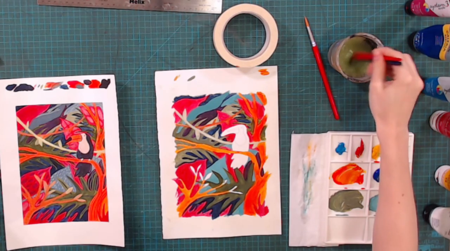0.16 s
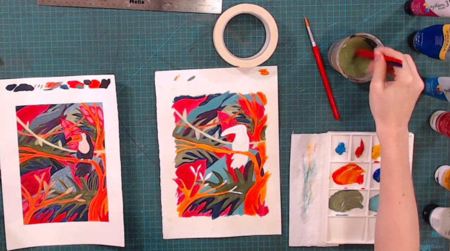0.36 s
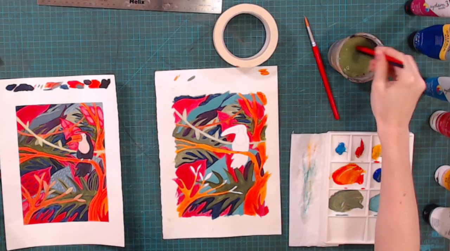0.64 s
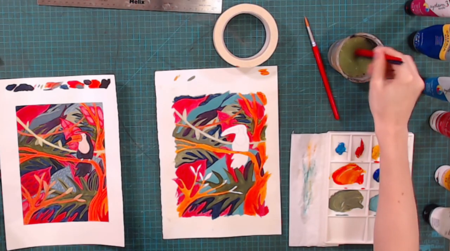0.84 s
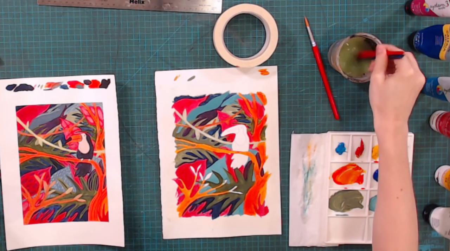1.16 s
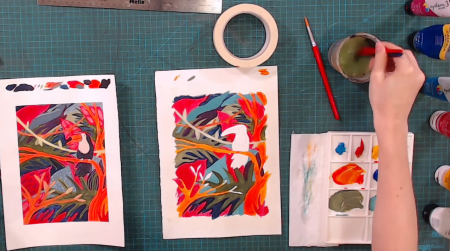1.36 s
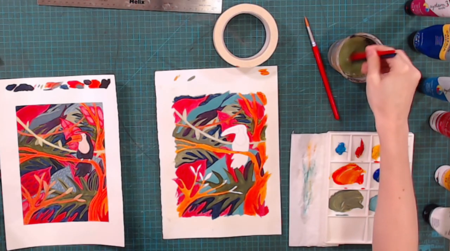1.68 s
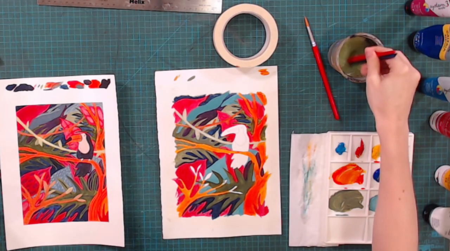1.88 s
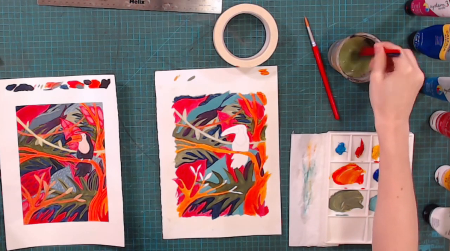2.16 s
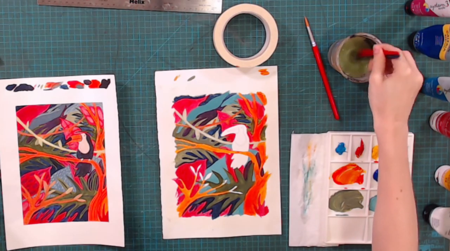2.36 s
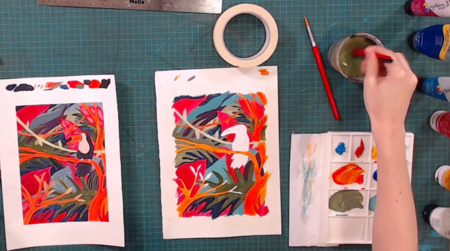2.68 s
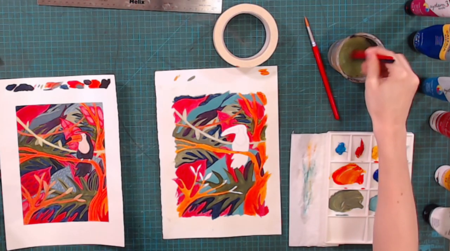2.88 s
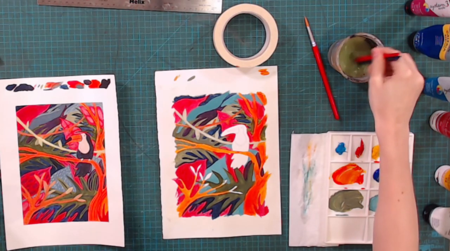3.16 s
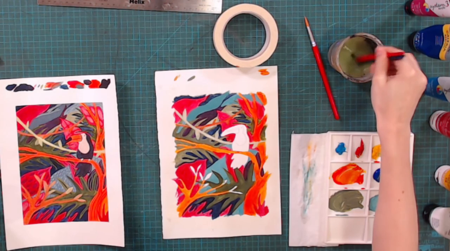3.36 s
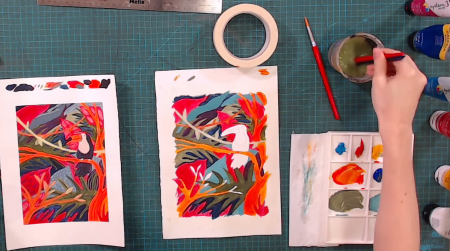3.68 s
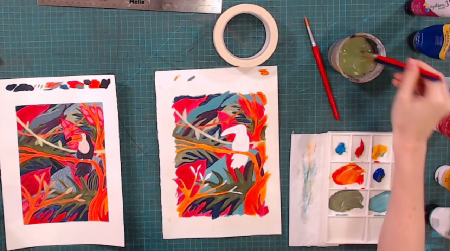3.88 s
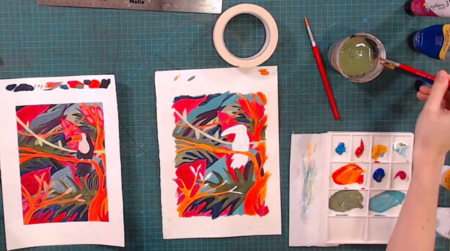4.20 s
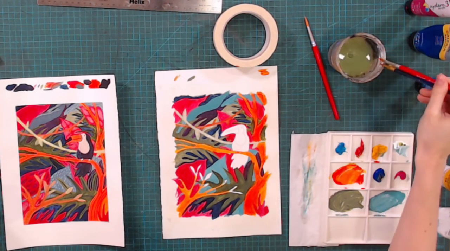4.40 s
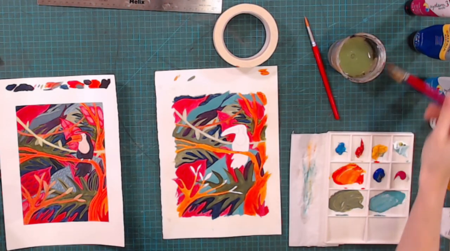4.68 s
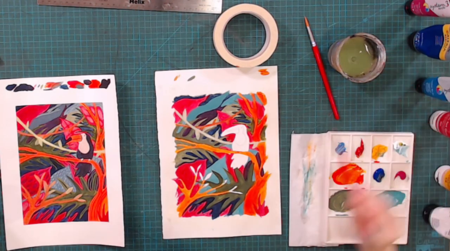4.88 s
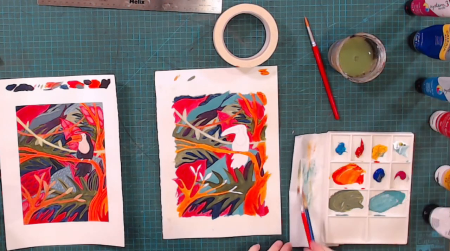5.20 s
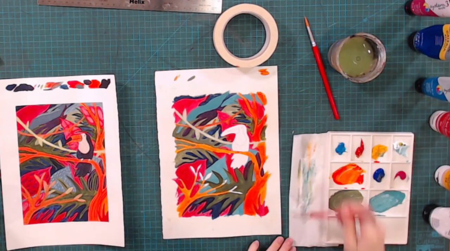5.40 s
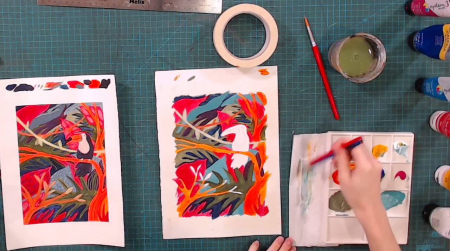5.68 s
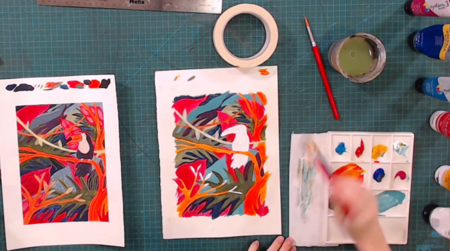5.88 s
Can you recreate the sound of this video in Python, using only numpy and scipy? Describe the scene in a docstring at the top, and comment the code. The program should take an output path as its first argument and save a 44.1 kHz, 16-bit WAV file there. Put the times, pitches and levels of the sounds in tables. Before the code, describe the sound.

Close up in a small quiet room, a wet paintbrush scrubs the bottom of a glass water jar about five times a second. Small bubbles gurgle, the jar thuds softly on the table, and a few bright clinks stand out. Stirring stops before four seconds; a light tap and rim wipe follow, then soft papery swipes and damp pats on a towel over faint hiss and hum.

```python
"""A paintbrush swirls in a glass jar of water: clinks on the glass and sharp ticks, each a noise tick plus damped modes.
Bubbles and two jar knocks are rising decaying tones; bristles scrub the bottom as shaped noise, exciting jar modes.
Pushes on the table ring its low modes. The brush is wiped on the rim, then on a paper towel: swelling noise and pats.
Air stirred by the arm rumbles faintly over hiss and hum. Two spaced microphones hear it all in a small room."""
import sys
import numpy as np
from scipy import signal
from scipy.fft import rfft, irfft
from scipy.io import wavfile
from scipy.ndimage import uniform_filter1d, minimum_filter1d

SR = 44100
rng = np.random.default_rng(int(sys.argv[2]) if len(sys.argv) > 2 else 0)


def transcribe(signal):
    """Save signal, clipped to [-1, 1], as a 16-bit WAV file at the path in sys.argv[1]."""
    frames = np.atleast_2d(signal).T
    limited = np.clip(frames, -1, 1)
    pcm = np.round(limited * 32767).astype(np.int16)
    wavfile.write(sys.argv[1], SR, pcm)


N = 266760
T = np.arange(N) / SR
# extra travel time from the jar to the right microphone; upper limit of the recorded band
LAG_S, TOP_HZ = 17 / SR, 16100

# Steady hiss. Each row: frequency in Hz, relative spectrum level in dB.
ROOM_TONE = [(15, -9.5), (27, 0), (38, -10.5), (52, -3.5), (75, -12), (105, -11), (130, -16), (200, -19.5),
             (370, -26), (700, -31.5), (1600, -36.5), (4000, -40), (10000, -41.5), (16000, -44)]
ROOM_TONE_DB = -42  # common level, before the shared and own gains
# Steady hum. Each row: frequency in Hz, rms level in dB.
HUM = [(100, -57.5), (162, -62), (300, -62)]
# Room reflections. Each row: frequency in Hz, relative spectrum level in dB.
ECHO = [(100, 4), (500, 10), (1500, 6.9), (3500, 4.7), (8000, 3.1), (11000, 6.2), (16000, 5.1)]

# Air stirred by the arm. Each row: time in seconds, level in dB before the microphone gains.
DRAUGHT = [(0.05, -45), (1.66, -42), (2.02, -35.5), (2.32, -43.5), (3.17, -37), (3.33, -43.5), (5.9, -46),
           (6.0, -41.5)]
# Stirred air. Each row: frequency in Hz, relative spectrum level in dB.
AIR = [(8, 1), (24, -6.5), (34, -9), (52, -13.5), (80, -23), (160, -27), (400, -42.5), (2000, -76)]
# Soft low pops, mostly on the left. Each row: start in seconds, left peak level in dB, length in seconds.
POPS = [(1.187, -11.5, 0.019), (1.821, -17, 0.03), (2.029, -16, 0.025), (3.761, -17.5, 0.0038)]

# Bristles wiped on the rim, then on the towel.
# Each row: start in seconds, length in seconds, mean level in dB, swell in seconds.
WIPES = [(4.46, 0.12, -50.5, 0.057), (4.99, 0.32, -47.5, 0.15), (5.528, .21, -43.5, 0.046),
         (5.885, .17, -50, 0.06)]
WIPE_RELEASE_S = 0.035
# Wiping noise. Each row: frequency in Hz, relative spectrum level in dB.
PAPER = [(200, -3), (700, -2.5), (1600, -6.5), (3000, -6), (5000, -6), (8000, -0.5), (11000, -5),
         (16000, -11.5)]
# Wet brush landing on the towel. Each row: start in seconds, level in dB before the envelope.
DABS = [(4.764, -38.5), (5.046, -39), (5.197, -37), (5.282, -40), (5.580, -31), (5.591, -38), (5.727, -40)]
# Landing noise. Each row: frequency in Hz, relative spectrum level in dB.
PAT = [(200, -15), (600, -9), (1600, -0.5), (3000, -7.5), (6000, -8), (16000, -10.5)]

# Jar pushed against the table. Each row: start in seconds, relative level in dB, contact time in seconds.
THUDS = [(0.06, -33, 0.0061), (.240, -30.5, 0.0061), (.258, -35, 0.0015), (0.438, -27, 0.0069),
         (0.458, -29, 0.0054), (.651, -31.5, 0.0055), (1.185, -40.5, 0.003), (2.245, -41, 0.002),
         (2.432, -37.5, 0.0043), (3.064, -26.5, 0.0053), (3.609, -35, 0.0042), (4.761, -42.5, 0.001)]
# Table modes. Each row: frequency in Hz, relative level in dB, 60 dB decay time in seconds.
TABLE = [(59.6, -5, 0.65), (87.6, -9, 0.34), (113.8, -2, 0.21), (142, -6, 0.23), (164, 3.5, 0.19),
         (190.6, -8.5, 0.25), (253, -6, 0.18), (404, 6, 0.038)]

# Brush pushed across the bottom, about five times a second.
# Each row: peak time in seconds, hiss level in dB, low grating in dB re the hiss.
STROKES = [(0.068, -36, -10), (0.262, -36.5, -1), (0.452, -35.5, -5.5), (.660, -44.5, -17),
           (.87, -42.5, -9), (1.066, -44.5, -13), (1.26, -45.5, -10), (1.453, -42, -6.5),
           (1.647, -45.5, -12), (1.855, -42.5, -11), (2.034, -38.5, -6.5), (2.247, -40, -2.5),
           (2.449, -37.5, -9.5), (2.666, -36.5, -9), (2.873, -44.5, -13), (3.077, -36.5, 1),
           (3.278, -43, -7), (3.465, -44, -15), (3.635, -46, -10)]
# A stroke grating at STROKE_DB lasts twice STROKE_HALF_S; every HALVING_DB harder halves its length.
STROKE_DB, STROKE_HALF_S, HALVING_DB, LONGEST_HALF_S = -44.5, 0.017, 13, 0.021
# Lighter swing back, midway between strokes: level at 0 dB vigour, and the share of the vigour it follows.
RETURN_DB, RETURN_HALF_S, RETURN_GRATE_DB, RETURN_SHARE = -43.5, 0.037, -8.5, 0.76
# Bristle hiss. Each row: frequency in Hz, relative spectrum level in dB.
BRISTLE = [(300, -46), (900, -34), (1600, -1), (2700, -1), (3600, -0.5), (4700, -4), (6000, 0), (8500, 3),
           (10500, -6), (16000, -7)]
# Jar and water shaken by the bristles.
# Each row: frequency in Hz, relative level in dB, 60 dB decay time in seconds.
JAR = [(301, -7.5, 0.048), (418, -7, 0.039), (577, -8.5, 0.012), (733, 0.5, 0.018), (884, -7.5, 0.086),
       (1284, -3, 0.013), (1592, -13, 0.066), (1760, -24, 0.022), (2070, -13.5, 0.011)]

# How briskly the water is stirred. Each row: time in seconds, relative level in dB.
VIGOUR = [(0, -17), (.6, -16), (1.4, -8.5), (1.8, -1.5), (2.25, -4.5), (2.9, -8.5), (3.65, -19)]
# Larger bubbles, and two short knocks of the jar at 2.293 (1505 Hz) and 3.320.
# Each row: start in seconds, starting pitch in Hz, relative level in dB.
BUBBLES_AND_KNOCKS = [(.001, 1403, -19), (.022, 1514, -26), (.060, 1630, -28), (.262, 834, -31),
                      (.387, 1304, -22), (.584, 2004, -29), (.708, 1640, -35), (1.483, 1370, -25.5),
                      (1.666, 1990, -32), (1.668, 2730, -32.5), (1.786, 1510, -21.5), (1.884, 1236, -23.5),
                      (2.039, 2500, -40), (2.074, 1360, -26), (2.075, 3060, -33), (2.176, 1395, -24.5),
                      (2.177, 2410, -27.5), (2.246, 1740, -32), (2.293, 1505, -20), (2.296, 1070, -23),
                      (2.664, 717, -30.5), (2.711, 1830, -35), (2.713, 2570, -39), (2.869, 1695, -38),
                      (2.870, 2370, -36.5), (3.320, 1590, -25.5), (3.323, 2310, -29), (3.610, 2070, -42.5),
                      (4.458, 740, -37)]
# A tone of BUBBLE_HZ rings for BUBBLE_T60_S; higher ones die sooner by this power of pitch.
BUBBLE_HZ, BUBBLE_T60_S, BUBBLE_DAMPING = 1500, 0.031, 0.22

# Clinks on glass and sharp ticks (bubble bursts at 0.7076, 2.293 and 2.7114).
# Each row: start in seconds, relative ring level in dB, brightness in dB per octave, relative tick level in dB.
CLINKS_AND_TICKS = [(0.019, -35, 3, -38), (0.169, -35, 0, -50), (0.255, -29, 0, -32), (0.356, -34, 18, -35),
                    (0.3995, -30.5, 22, -41), (0.4416, -50, 0, -34), (.585, -40, -8, -39.5),
                    (.6535, -33, -4, -42), (0.7076, -36, -1, -20.5), (0.8852, -1, 2.5, -25),
                    (1.019, -35, 11, -51), (1.2714, -8, 1, -16), (1.483, -32, -1, -32),
                    (1.8720, -9, -2, -13.5), (2.293, -35, -7, -26.5), (2.7114, -27, -3, -21.5),
                    (3.067, -39, -2, -37), (3.314, -20, -7.5, -30), (3.3212, -32, -10, -26),
                    (3.457, -30.5, -7, -34), (3.6093, -37, 14, -39), (4.0719, -22.5, 7, -43),
                    (4.4557, -30.5, 0, -32)]
# Jar wall modes. Each row: frequency in Hz, relative level in dB, 60 dB decay time in seconds,
# left minus right in dB.
GLASS = [(1250, -20, 0.0075, 2), (1625, -6, 0.022, -5.5), (2120, -9, 0.016, -8), (2800, -2, 0.0096, 0),
         (3070, 2.5, 0.0021, -3), (3594, 4, 0.0083, 1), (3550, -13, 0.013, 2), (5416, 5.5, 0.012, -2),
         (5460, -9, 0.0056, -25), (6170, -10, 0.0052, 9), (6870, 0.5, 0.0067, 7), (6880, -5, 0.0083, 36),
         (7480, -5.5, 0.021, 13), (9040, 2, 0.017, 2), (9700, -16, 0.0086, 22), (11360, -5, 0.0079, 12),
         (12800, -18, 0.011, 3), (13600, -20, 0.0065, -4)]
# Chatter after each clink. Each row: frequency in Hz, relative spectrum level in dB before the brightness tilt.
CHATTER = [(200, -30), (900, -8.5), (1800, -5), (2600, -1), (3350, 10), (4600, -0.5), (5500, 3),
           (8800, 3.5), (10200, -9.5), (16000, -20)]
# Dry tick, of ferrule or bursting bubble. Each row: frequency in Hz, relative spectrum level in dB.
TICK = [(100, -17), (600, -8.5), (1800, 1), (4500, 4), (6500, -6), (9000, 0), (16000, -1)]


def undb(db):
    """Decibels to amplitude gain."""
    return 10 ** (np.asarray(db) / 20)


def unit(x):
    """Scale to rms 1."""
    return x / np.sqrt(np.mean(x ** 2))


def add(out, start_s, sound):
    """Mix a sound into out at start_s."""
    i = max(int(start_s * SR), 0)
    out[:, i:i + sound.shape[-1]] += sound[..., :N - i]


def colour(x, points):
    """Shape by a (Hz, dB) spectrum, linear over log frequency; rms 1."""
    hz, db = np.transpose(points)
    bin_hz = np.fft.rfftfreq(x.shape[-1], 1 / SR) + 1  # +1 avoids log 0
    gain = undb(np.interp(np.log(bin_hz), np.log(hz), db))
    return unit(irfft(rfft(x) * gain, x.shape[-1]))


def curve(rows):
    """Join (s, value) rows by straight lines."""
    return np.interp(T, *np.transpose(rows))


def walk(rate_hz):
    """Random levels held 1 / rate_hz and slewed; rms 1."""
    hold = max(int(SR / rate_hz), 1)
    held = rng.standard_normal(N)[np.arange(N) // hold]
    return unit(uniform_filter1d(held, hold))


def arrival(size):
    """Time in s since a sound reached each microphone; the right one is further off."""
    return np.maximum(np.arange(size) / SR - np.array([[0], [LAG_S]]), 0)


def fade(t, t60_s):
    """Exponential decay, 60 dB in t60_s."""
    return np.exp(-np.log(1000) * t / t60_s)


def rise(t, rise_s):
    """Exponential onset with time constant rise_s."""
    return 1 - np.exp(-t / rise_s)


def friction(grain_db, grain_hz):
    """Countless hairs catch and slip in small clumps: noise with randomly varying level."""
    return rng.standard_normal((2, N)) * undb(grain_db * walk(grain_hz))


def room_tone(shared_db=-3, own_db=3):
    """Steady hiss and hum; the hiss is shared in the bass, and mostly separate at each microphone above."""
    own = colour(rng.standard_normal((2, N)), ROOM_TONE)
    lowpass = signal.butter(1, 400, fs=SR)
    shared = signal.lfilter(*lowpass, colour(rng.standard_normal(N), ROOM_TONE))
    own_thinned = own - 0.5 * signal.lfilter(*lowpass, own)
    hiss = undb(ROOM_TONE_DB) * (undb(shared_db) * shared + undb(own_db) * own_thinned)
    hum = sum(undb(db) * np.sqrt(2) * np.sin(2 * np.pi * (hz * T + rng.random())) for hz, db in HUM)
    return hiss + hum


def draught(left_db=12, right_db=0, gust_db=2, gust_hz=9, pop_right_db=-14):
    """Slow gusting eddies make low noise and a few pops of air, mostly on the left microphone."""
    gusts = undb(curve(DRAUGHT) + gust_db * walk(gust_hz))
    out = colour(rng.standard_normal((2, N)), AIR) * gusts * undb([[left_db], [right_db]])
    for start_s, db, length_s in POPS:
        pop = np.hanning(max(int(length_s * SR), 8))
        add(out, start_s, undb(db) * pop * undb([[0], [pop_right_db]]))
    return out


def wipes(dab_t60_s=0.047, dab_rise_s=0.0029, uneven_db=1.3, uneven_hz=25):
    """Damp bristles drawn over a surface swell, hold and lift off; a soft pat marks each landing on the towel."""
    press = np.zeros(N)
    for start_s, length_s, db, swell_s in WIPES:
        end_s = start_s + length_s
        corners_s = [start_s, start_s + swell_s, end_s, end_s + WIPE_RELEASE_S]
        press += undb(db) * np.interp(T, corners_s, [0, 1, 1, 0])
    press *= undb(uneven_db * walk(uneven_hz))
    out = press * colour(friction(grain_db=1.5, grain_hz=470), PAPER)
    t = arrival(size=3000)
    for start_s, db in DABS:
        pat = colour(rng.standard_normal(t.shape), PAT) * fade(t, dab_t60_s) * rise(t, dab_rise_s)
        add(out, start_s, undb(db) * pat)
    return out


def thuds(gain_db=1, side_share=0.32, build_s=0.0012):
    """A soft push through the jar sets the table top ringing; longer contact is duller."""
    out, t = np.zeros((2, N)), np.arange(SR // 2) / SR
    for start_s, level_db, contact_s in THUDS:
        ring = np.zeros((2, len(t)))
        for hz, db, t60_s in TABLE:
            side_gain = 1 + side_share * rng.standard_normal((2, 1))
            ring += undb(db) * side_gain * np.sin(2 * np.pi * hz * t) * fade(t, t60_s)
        ring *= rise(t, build_s)
        push = np.hanning(max(int(contact_s * SR), 8))
        thud = signal.fftconvolve(ring, push[None] / push.sum())
        add(out, start_s, undb(level_db + gain_db) * thud)
    return out


def vigour(s):
    """Briskness of the stirring at time s, in dB."""
    return np.interp(s, *np.transpose(VIGOUR))


def half_length(grating_db):
    """Half length of a stroke in s: harder strokes are shorter."""
    return min(STROKE_HALF_S * 2 ** ((STROKE_DB - grating_db) / HALVING_DB), LONGEST_HALF_S)


def swings():
    """Rows (peak s, half length s, hiss dB, grating dB re hiss): strokes, then a swing back between each two."""
    pushes = [(s, half_length(db + grate_db), db, grate_db) for s, db, grate_db in STROKES]
    peak_s = np.array(STROKES)[:, 0]
    returns = [(s, RETURN_HALF_S, RETURN_DB + RETURN_SHARE * vigour(s), RETURN_GRATE_DB)
               for s in (peak_s[:-1] + peak_s[1:]) / 2]
    return pushes + returns


def scrubs(jar_db=1):
    """Bristles dragged over the glass hiss wetly, and their slips excite a hollow grating from the jar."""
    hiss_level, grate_level = np.zeros(N), np.zeros(N)
    for peak_s, half_s, db, grate_db in swings():
        press = undb(db) / (1 + ((T - peak_s) / half_s) ** 4 / 2)
        hiss_level += press
        grate_level += press * undb(grate_db)
    t = np.arange(SR // 8) / SR
    # dividing by sqrt(t60_s) evens out the energy of long and short modes
    body = sum(undb(db) * np.sin(2 * np.pi * hz * t) * fade(t, t60_s) / np.sqrt(t60_s)
               for hz, db, t60_s in JAR)
    slips = grate_level * unit(friction(grain_db=5.5, grain_hz=220))
    grating = signal.fftconvolve(slips, unit(body)[None] / np.sqrt(len(t)), axes=1)[:, :N]
    hiss = hiss_level * colour(friction(grain_db=2.5, grain_hz=680), BRISTLE)
    return hiss + undb(jar_db) * grating


def rising_tone(hz, t, glide_per_s):
    """Sine whose pitch rises linearly from hz."""
    return np.sin(2 * np.pi * hz * t * (1 + glide_per_s * t / 2))


def slosh(base_db=-40.0, lag_s=0.012, scatter_s=0.028, centre_hz=1900, spread=0.36, cycles=38,
          size_db=4, glide_per_s=8, count=26):
    """Each stroke folds in a cloud of small bubbles, louder when stirring is brisk; decay is a count of cycles."""
    out, t = np.zeros((2, N)), arrival(size=2600)
    for stroke_s, _, _ in STROKES:
        for when, pitch, size in rng.standard_normal((count, 3)):
            start_s = stroke_s + lag_s + scatter_s * when
            hz = centre_hz * np.exp(spread * pitch)
            db = base_db + vigour(start_s) + size_db * np.clip(size, -2, 1)
            add(out, start_s, undb(db) * rising_tone(hz, t, glide_per_s) * fade(t, cycles / hz))
    return out


def bubbles_and_knocks(glide_per_s=5, rise_s=0.001, splash_db=-11, splash_width=0.23, gain_db=5):
    """Trapped air rings, rising in pitch near the surface, with a short splash; two jar knocks are made alike."""
    out, t = np.zeros((2, N)), arrival(size=4000)
    for start_s, hz, db in BUBBLES_AND_KNOCKS:
        t60_s = BUBBLE_T60_S * (BUBBLE_HZ / hz) ** BUBBLE_DAMPING
        tone = rising_tone(hz, t, glide_per_s)
        spread = 2 * np.exp(2 * splash_width)
        band = [(hz / spread, -40), (hz, 0), (hz * spread, -40)]
        splash = np.interp(t, t[0], colour(rng.standard_normal(t.shape[1]), band))
        envelope = fade(t, t60_s) * rise(t, rise_s)
        add(out, start_s, undb(db + gain_db) * (tone + undb(splash_db) * splash) * envelope)
    return out


def clinks_and_ticks(chatter_db=-4.0, chatter_t60_s=0.018, chatter_lag_s=0.000899, tick_t60_s=0.0091,
                     scatter_db=1, rise_s=0.00025, right_db=2.0):
    """A dry tick over a milliseconds-long ring of glass; water damps it and the wall radiates unevenly."""
    out, t = np.zeros((2, N)), arrival(size=2600)
    # axes: mode, microphone, time
    hz, db, t60_s, pan_db = np.transpose(GLASS)[:, :, None, None]
    db = db + pan_db * np.array([[0.5], [-0.5]])
    onset = rise(t, rise_s)
    for start_s, ring_db, bright_db, tick_db in CLINKS_AND_TICKS:
        gain = undb(db + bright_db * np.log2(hz) + scatter_db * rng.standard_normal(db.shape))
        # random phase per mode and microphone, wider at higher pitch
        phase = rng.standard_normal(db.shape) * hz / 7000
        modes = gain * np.sin(2 * np.pi * hz * t + phase) * fade(t, t60_s)
        ring = modes.sum(0) / np.sqrt((gain ** 2).sum() / 4)  # near rms 1 before decay
        tick_noise = np.interp(t, t[0], colour(rng.standard_normal(t.shape[1]), TICK))
        tick = tick_noise * fade(t, tick_t60_s) * (t > 0)
        add(out, start_s, undb(ring_db) * ring * onset + undb(tick_db) * tick)
        # a brief chatter follows, with half the ring's tilt
        tilted = [(f, level + bright_db * np.log2(f) / 2) for f, level in CHATTER]
        chatter = colour(rng.standard_normal(t.shape), tilted) * fade(t, chatter_t60_s) * onset
        add(out, start_s + chatter_lag_s, undb(ring_db + chatter_db) * chatter)
    return out * undb([[0], [right_db]])


def room(x, t60_s=0.37, first_s=0.0036):
    """Dense reflections follow milliseconds behind; each input channel reaches both microphones."""
    t = np.arange(SR // 2) / SR
    out = 0
    for direction in x:
        build = np.clip(t / first_s - 1, 0, 1)
        tail = colour(rng.standard_normal((2, len(t))), ECHO) * fade(t, t60_s) * build
        tail = unit(tail) / np.sqrt(2 * len(t))
        out = out + signal.fftconvolve(direction[None], tail, axes=1)[:, :N]
    return out


def scene(glass_wet_db=-12, water_wet_db=-14, rest_wet_db=-10):
    """Jar, table and wiping in the room, over draught and steady background."""
    glass = clinks_and_ticks()
    water = bubbles_and_knocks() + slosh()
    rest = scrubs() + thuds() + wipes()
    echo = room(undb(glass_wet_db) * glass + undb(water_wet_db) * water + undb(rest_wet_db) * rest)
    return glass + water + rest + echo + draught() + room_tone()


def record(dry):
    """A very fast limiter per channel holds peaks to full scale; then the band above TOP_HZ is cut."""
    gain = minimum_filter1d(1 / np.maximum(np.abs(dry), 1), size=25, axis=1)
    held = dry * uniform_filter1d(gain, size=25, axis=1)
    lowpass = signal.ellip(8, 0.1, 60, TOP_HZ, fs=SR, output="sos")
    return signal.sosfiltfilt(lowpass, held)


dry = scene()
out = record(dry)
transcribe(out)
```